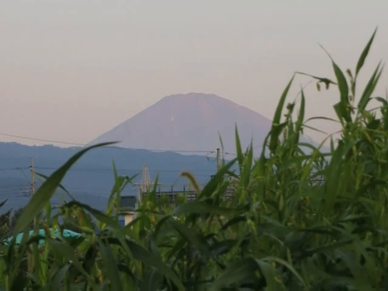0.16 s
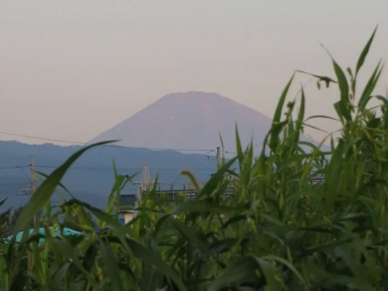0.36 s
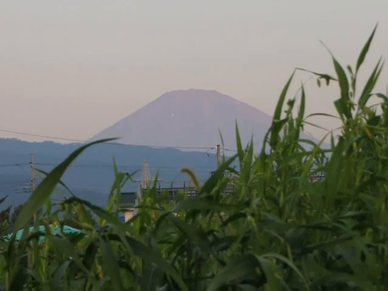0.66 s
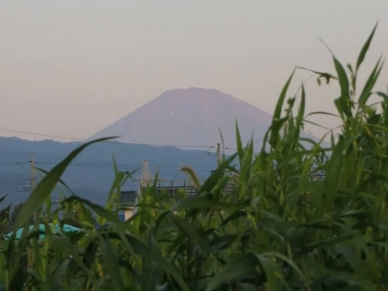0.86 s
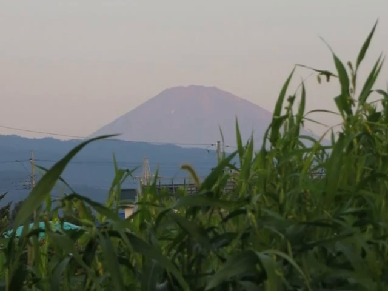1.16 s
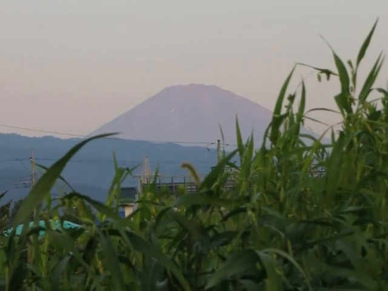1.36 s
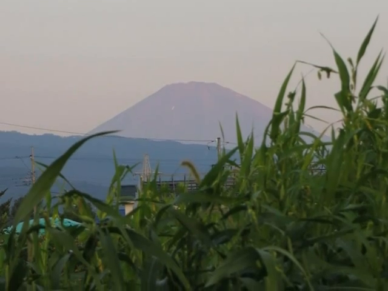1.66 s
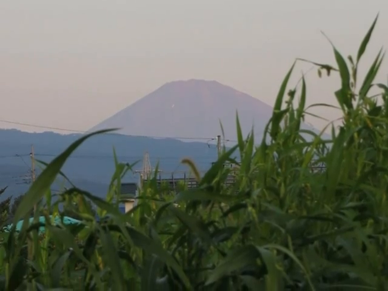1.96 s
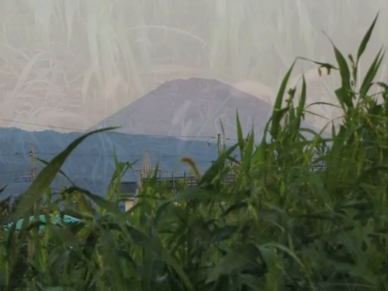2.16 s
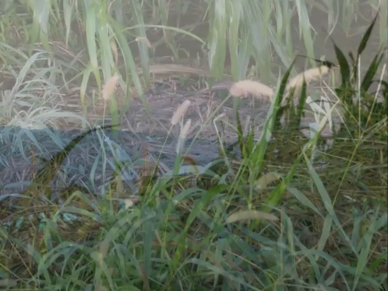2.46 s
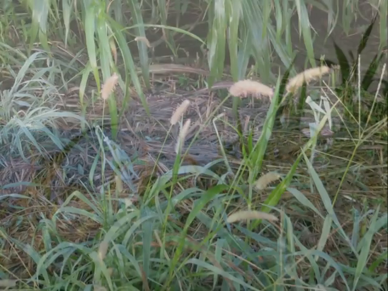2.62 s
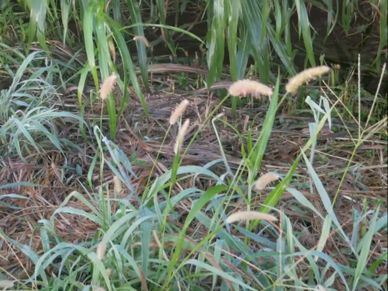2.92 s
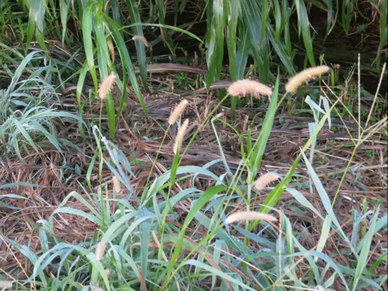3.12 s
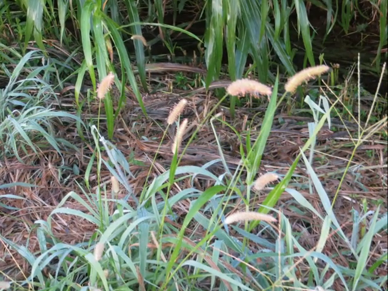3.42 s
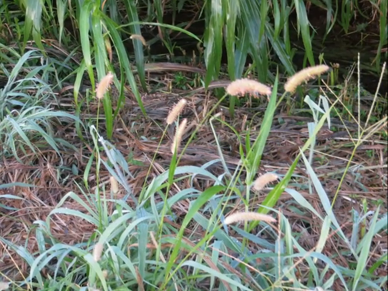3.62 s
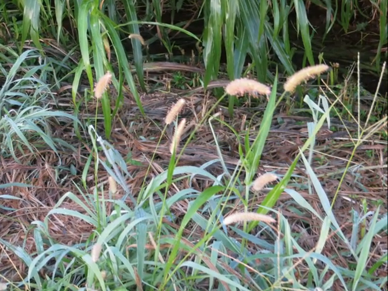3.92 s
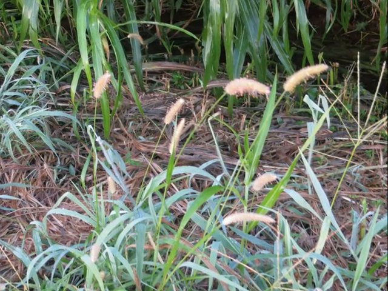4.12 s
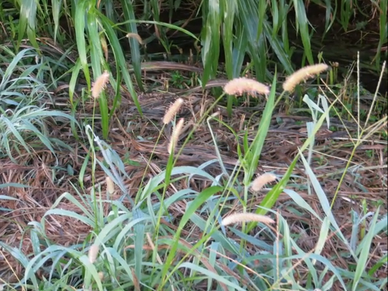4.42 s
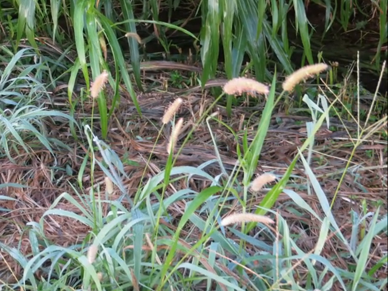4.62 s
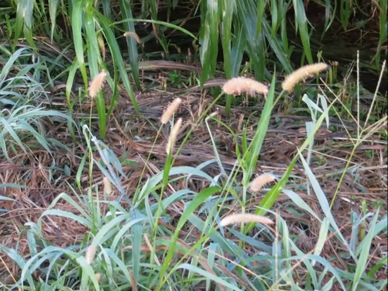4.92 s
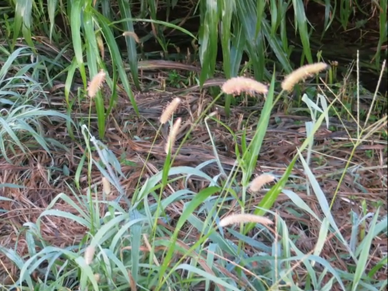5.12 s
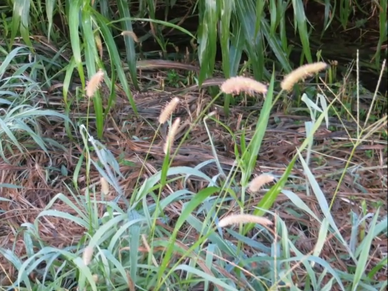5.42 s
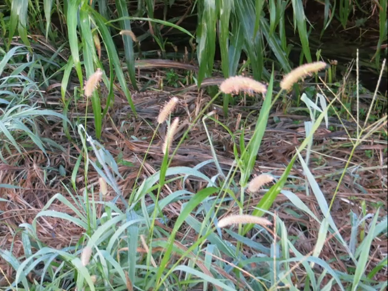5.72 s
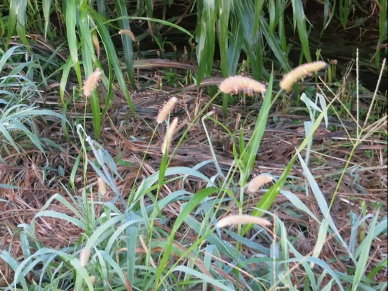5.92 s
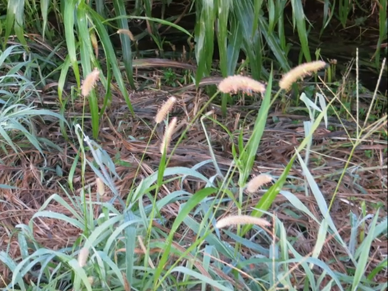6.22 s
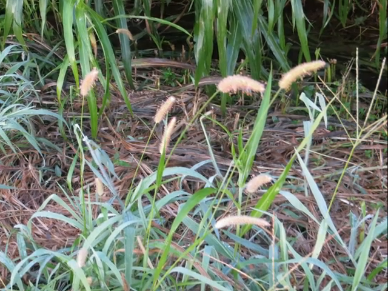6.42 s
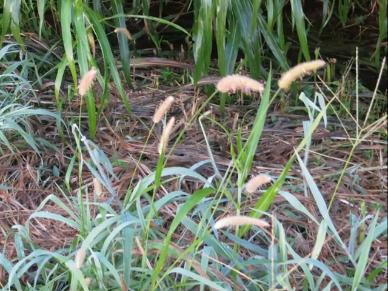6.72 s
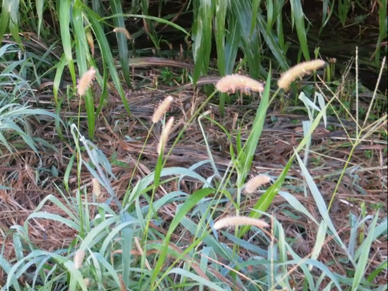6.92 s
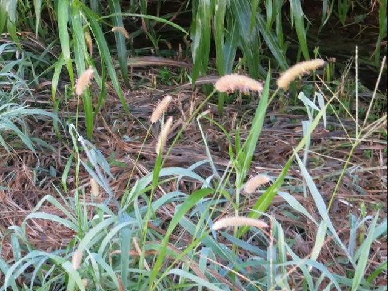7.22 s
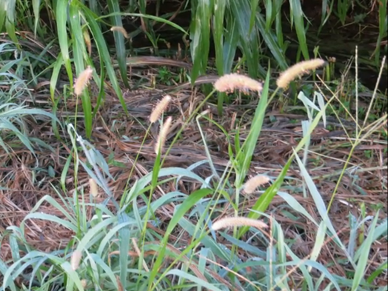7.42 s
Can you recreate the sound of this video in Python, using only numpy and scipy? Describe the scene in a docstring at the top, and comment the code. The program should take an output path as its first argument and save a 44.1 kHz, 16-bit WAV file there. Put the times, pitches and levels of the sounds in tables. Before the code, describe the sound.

A dusk field of insects: crisp rapid cricket chirps, lower drawn-out churrs and a blurred far chorus above a soft traffic rumble.

```python
"""Crickets in tall field grass at dusk: some near, some fainter, chirp in bursts of short falling wing strokes;
small ones trill above them, deeper ones draw long strokes and small groups of shorter ones, and a far crowd
blurs into bands. A whistle, soft blips and ticks pass; distant traffic and open air are shaped noise.
A small camera samples at half rate and holds each sample, mirroring the treble."""
import sys
import numpy as np
from scipy import signal
from scipy.fft import rfft, irfft, next_fast_len
from scipy.io import wavfile
from scipy.ndimage import map_coordinates

SR = 44100
rng = np.random.default_rng(int(sys.argv[2]) if len(sys.argv) > 2 else 0)


def store_pcm(level_fs):
    """Save levels as 16-bit WAV."""
    pcm = np.round(np.clip(level_fs, -1, 1) * 32767).astype(np.int16)
    wavfile.write(sys.argv[1], SR, np.atleast_2d(pcm).T)


def gain_from_db(level_db):
    """Convert decibel levels to linear amplitude factors (20 dB per decade)."""
    decades = np.asarray(level_db, float) / 20
    return 10 ** decades


N = 333837

# Wings, one row per singer: centre in Hz, fall in Hz, stroke in ms, swell exponent (above 1 swells late),
# period in ms, share of energy heard through grass 0-1.
CHIRP_WINGS = [(4650, 950, 11, 1.2, 17.3, .1), (4750, 1000, 11.5, 1.2, 15.9, .1),
               (4850, 1150, 12, 1.45, 14.6, .15), (5000, 1150, 12.5, 1.1, 15.5, .25),
               (5300, 1500, 14.5, 1.75, 15.85, .15)]
TRILL_WINGS = [(6500, 1100, 17, 1.1, 27.8, .1), (6750, 1300, 22, 1.6, 28.3, .6),
               (7300, 600, 20, 1, 23.1, .5), (7600, 600, 18, 1, 25.5, .5)]
# Chirp bouts, one list per singer. Each row: first stroke in seconds, base level in dB, chirps,
# seconds between chirps.
CHIRP_BOUTS = [
    [(1.151, -44, 1, .14), (3.1245, -42, 1, .14), (4.087, -40.5, 4, .137), (6.207, -39.5, 5, .1422)],
    [(.212, -45.5, 6, .1643), (1.974, -44.5, 6, .1631), (2.701, -47, 3, .1685), (4.794, -45.5, 6, .1625),
     (6.777, -45, 5, .163), (7.004, -46.5, 2, .163)],
    [(-.073, -45.5, 4, .1447), (.76, -39, 8, .1463), (3.123, -38, 7, .1463), (5.157, -38, 10, .1437)],
    [(.0943, -48, 7, .1545), (1.943, -46.5, 7, .141), (3.442, -49, 5, .153), (4.262, -48, 5, .158),
     (5.65, -49, 1, .15), (6.312, -48, 2, .165), (7.036, -48, 3, .147)],
    [(-.0205, -40.5, 2, .1535), (1.13, -41.5, 11, .1522), (3.843, -40.5, 12, .1525),
     (6.443, -40.5, 9, .1532)],
]
# Chirp habits, one row per singer: strokes a chirp, dB gained from stroke to stroke,
# dB added to a bout's opening chirp, dB added to its closing chirp.
CHIRP_HABITS = [(4, 3, -3.5, -0.5), (5, -1, -1, -4), (4, 0.4, -8, 1), (5, -1, 1, -2), (4, -0.54, -4, -2)]
# Trill bursts, one list per singer. Each row: first stroke in seconds, base level in dB, strokes.
TRILL_BURSTS = [
    [(0.560, -47.5, 6), (1.275, -48, 6), (2.013, -47, 5), (2.877, -47, 5), (3.754, -47.5, 5),
     (4.376, -48, 5), (5.397, -48.5, 5), (6.342, -48.5, 5), (7.317, -47.5, 5)],
    [(0.7822, -52.5, 5), (2.1177, -52, 4), (3.4537, -52, 5), (4.642, -53.5, 5), (4.736, -54, 5),
     (5.886, -52.5, 5), (7.2371, -52, 5)],
    [(4.823, -48.5, 5), (5.5475, -48, 5), (6.94, -47.5, 5)],
    [(0.0514, -55.5, 5), (1.5764, -56.5, 5), (2.9674, -54, 5), (4.523, -55, 5), (5.972, -54.5, 5),
     (7.4246, -55, 5)],
]
# Deep groups, one list per kind of stroke: near long strokes, short grouped strokes, a second singer's
# long strokes, a far singer's strokes. Each row: first stroke in seconds, base level in dB, strokes,
# seconds between strokes.
DEEP_GROUPS = [
    [(-.064, -39.5, 5, .0798), (4.3515, -39.3, 8, .0808)],
    [(.389, -42, 4, .0535), (.676, -41.5, 3, .0515), (.8925, -41.5, 2, .051), (1.072, -42, 2, .046),
     (1.272, -44, 2, .054), (1.47, -43, 2, .055), (3.567, -49.5, 3, .162), (4.009, -49, 2, .049),
     (5.033, -41, 4, .054), (5.322, -42, 2, .051), (5.493, -42, 2, .05), (5.679, -42, 2, .049),
     (5.855, -43, 2, .052), (7.112, -51, 3, .047), (7.362, -47, 2, .157)],
    [(3.127, -43, 4, .0733), (6.64, -43.5, 6, .0733)],
    [(.325, -49, 5, .072), (.831, -52, 1, .08), (1.045, -51, 6, .086), (1.56, -51, 6, .076),
     (2.126, -52, 2, .1), (2.276, -52, 2, .05), (2.475, -52, 2, .096), (4.247, -47.5, 6, .072),
     (5.608, -51, 11, .0823), (6.505, -47.5, 8, .0772), (7.275, -50, 1, .08), (7.476, -51, 1, .08)],
]
# Deep strokes, one row per kind: centre in Hz, mean stroke in ms, dB added to a group's opening stroke.
DEEP_STROKES = [(3574, 49, -4), (3533, 40, -2), (3610, 53.5, -3), (3797, 40, -1.5)]
# Far crowds. Each row: centre in Hz, spread in Hz, fall in Hz, stroke in ms, strokes a second, rms in dB.
FAR_CROWDS = [(3703, 100.6, 455, 40, 90, -58.5), (4874, 136, 1030, 13, 75, -62.5),
              (7390, 170, 380, 20, 200, -72)]
# One rising whistle: middle in seconds, level in dB, centre in Hz, rise in Hz, length in ms.
RISING_WHISTLE = (4.3, -58, 5750, 1500, 55)
# Soft short far notes. Each row: middle in seconds, level in dB, pitch in Hz.
SOFT_BLIPS = [(1.4, -57, 700), (3.068, -56, 540), (4.4, -57, 900)]
# Faint ticks. Each row: middle in seconds, level in dB, centre in Hz.
DRY_TICKS = [(0.4415, -49, 2220), (1.4688, -52, 1360), (3.3187, -48, 2170), (6.4877, -55, 2260)]
# Traffic course. Each row: time in seconds, rumble rms in dB, engine drone rms in dB.
TRAFFIC_LEVELS = [(0.0, -42.5, -56.5), (6.64, -41.5, -71), (7.57, -43, -71)]
# Traffic rumble spectrum. Each row: frequency in Hz, relative density in dB per Hz.
ROAD_SPECTRUM = [(11, -43), (18, -9.5), (48, 0.5), (92, -7), (145, -7.5), (226, -17.5), (500, -36.5),
                 (650, -47), (1100, -120)]
# Open air hiss spectrum. Each row: frequency in Hz, relative density in dB per Hz.
AIR_SPECTRUM = [(150, -47), (400, -3), (700, -0.2), (1100, -5), (2000, -8), (3000, -13), (4200, -2),
                (6000, -10.5), (8200, -15.5), (9500, -18), (11000, -13)]


def unit(x):
    """Scale x to rms 1."""
    return x / np.sqrt(np.mean(x ** 2) + 1e-20)


def filtered(x, response):
    """Multiply the spectrum of x by response(Hz)."""
    m = next_fast_len(N + 8192)
    return irfft(rfft(x, m) * response(np.fft.rfftfreq(m, 1 / SR)), m)[:N]


def wobble(rate_hz):
    """Smooth random curve through rate_hz knots a second."""
    knots = rng.standard_normal(int(N * rate_hz / SR) + 4)
    return map_coordinates(knots, [np.arange(N) * rate_hz / SR])


def coloured(spectrum):
    """Noise of rms 1, its spectrum interpolated over log frequency."""
    f_hz, level_db = np.transpose(spectrum)

    def response(hz):
        return gain_from_db(np.interp(np.log(hz + 1), np.log(f_hz + 1), level_db))

    return unit(filtered(rng.standard_normal(N), response))


def unrolled(rows):
    """Time, level and index in series of each repeat, from rows of (s, dB, count, gap in s)."""
    first_s, level_db, count, gap_s = np.transpose(rows)
    row = np.repeat(np.arange(len(rows)), np.round(count).astype(int))
    k = np.arange(len(row)) - np.searchsorted(row, row)
    return first_s[row] + k * gap_s[row], level_db[row], k


def strokes(middle_s, level_db, hz, fall_hz, ms, octave_db, peak):
    """Tones that fall as the scraper slows, with an octave partial; peak above 1 swells late."""
    columns = np.broadcast_arrays(middle_s, level_db, hz, fall_hz, ms)
    middle_s, level_db, hz, fall_hz, ms = (c[:, None] for c in columns)
    t = np.arange(int(np.max(ms) * SR / 1000) + 1)
    progress = np.minimum(t / (ms * SR / 1000), 1)
    cycles = np.cumsum(hz + fall_hz * (.5 - progress), axis=1) / SR
    phase = 2 * np.pi * (cycles + rng.random(middle_s.shape))
    envelope = gain_from_db(level_db) * np.sin(np.pi * progress ** peak)
    tone = envelope * (np.sin(phase) + gain_from_db(octave_db) * np.sin(2 * phase))
    # a second of margin each side holds strokes that cross the ends
    start = np.round((middle_s - ms / 2000) * SR).astype(int) + SR
    return np.bincount((start + t).ravel(), tone.ravel(), minlength=N + 2 * SR)[SR:N + SR]


def grass(x, t60_s):
    """Scatter off stems and leaves: a short dense tail of energy 1, new each third of a second."""
    out = np.zeros(N + SR)
    step = SR // 3
    t = np.arange(SR // 4) / SR
    for k in range(0, N, step):
        tail = rng.standard_normal(len(t)) * gain_from_db(-60 * t / t60_s)
        wet = signal.fftconvolve(x[k:k + step], tail / np.linalg.norm(tail))
        out[k:k + len(wet)] += wet
    return out[:N]


def bursts(rows, wings, first_db, scatter_db, octave_db, t60_s, grow_db=0):
    """Evenly spaced wing strokes, the first offset by first_db; part arrives through the grass."""
    hz, fall_hz, ms, peak, period_ms, hidden = wings
    s, level_db, k = unrolled([(*row, period_ms / 1000) for row in rows])
    chance = rng.standard_normal((len(s), 2))
    level_db = level_db + first_db * (k == 0) + grow_db * (k - 2) + scatter_db * chance[:, 0]
    song = strokes(s, level_db, hz + 25 * chance[:, 1], fall_hz, ms, octave_db, peak)
    return np.sqrt(1 - hidden) * song + np.sqrt(hidden) * grass(song, t60_s)


def chirpers():
    """Five singers, some near and some fainter, chirp steadily within each bout; wings sound the octave."""
    jitter_s, scatter_db = .001, 1
    total = np.zeros(N)
    for rows, wings, habit in zip(CHIRP_BOUTS, CHIRP_WINGS, CHIRP_HABITS):
        count, grow_db, opening_db, closing_db = habit
        s, level_db, k = unrolled(rows)
        closing = np.roll(k, -1) == 0
        chance = rng.standard_normal((len(s), 2))
        chirp_s = s + jitter_s * chance[:, 0]
        chirp_db = level_db + opening_db * (k == 0) + closing_db * closing + scatter_db * chance[:, 1]
        chirps = np.transpose([chirp_s, chirp_db, count + 0 * s])
        total += bursts(chirps, wings, first_db=-1.5, scatter_db=1.7, octave_db=-23.5,
                        t60_s=0.065, grow_db=grow_db)
    return total


def trillers():
    """Four small high singers, their strokes longer and slower than the chirpers'."""
    return sum(bursts(rows, wings, first_db=-4, scatter_db=0.6, octave_db=-60, t60_s=0.076)
               for rows, wings in zip(TRILL_BURSTS, TRILL_WINGS))


def deep_singers():
    """Long strokes and small groups of shorter ones, all falling at the same speed, plus grass scatter."""
    fall_hz_per_ms = 11.23
    direct = np.zeros(N)
    for rows, (hz, ms, opening_db) in zip(DEEP_GROUPS, DEEP_STROKES):
        s, level_db, k = unrolled(rows)
        chance = rng.standard_normal((len(s), 3))
        stroke_ms = ms * (1 + .06 * chance[:, 0])
        stroke_db = level_db + opening_db * (k == 0) + 0.93 * chance[:, 1]
        direct += strokes(s, stroke_db, hz + 12 * chance[:, 2], fall_hz_per_ms * stroke_ms, stroke_ms,
                          octave_db=-31, peak=1.0)
    return direct + gain_from_db(-11.0) * grass(direct, t60_s=0.05)


def crowds():
    """Many far singers at scattered moments, swelling a little, heard through the grass."""
    total = np.zeros(N)
    for hz, spread_hz, fall_hz, ms, rate_hz, rms_db in FAR_CROWDS:
        s = np.arange(0, N / SR, 1 / rate_hz)
        chance = rng.standard_normal((len(s), 3))
        stroke_s = s + .3 * chance[:, 0] / rate_hz
        stroke_hz = hz + spread_hz * np.clip(chance[:, 2], -1.5, 1.5)
        calls = strokes(stroke_s, 2.5 * chance[:, 1], stroke_hz, fall_hz, ms, octave_db=-40, peak=1)
        total += gain_from_db(rms_db + .8 * wobble(6.5)) * unit(calls + .7 * grass(calls, t60_s=.1))
    return total


def whistle():
    """One faint short tone gliding up."""
    s, level_db, hz, rise_hz, ms = np.array(RISING_WHISTLE)[:, None]
    return strokes(s, level_db, hz, -rise_hz, ms, octave_db=-60, peak=0.87)


def blips():
    """Soft steady tones of 35 ms that swell early."""
    s, level_db, hz = np.transpose(SOFT_BLIPS)
    return strokes(s, level_db, hz, 0, 35, octave_db=-60, peak=.7)


def ticks():
    """Dry falling tones about nine cycles long, with a strong octave."""
    s, level_db, hz = np.transpose(DRY_TICKS)
    return strokes(s, level_db, hz, 0.37 * hz, 9000 / hz, octave_db=-6, peak=0.98)


def traffic():
    """Smooth low rumble of noise, and a narrow noise drone that fades as it draws away."""
    drone_hz, drone_width_hz = 275, 87
    s, *levels = np.transpose(TRAFFIC_LEVELS)
    rumble_db, drone_db = (np.interp(np.arange(N) / SR, s, level) for level in levels)
    rumble = gain_from_db(rumble_db + 1.2 * wobble(2.95)) * coloured(ROAD_SPECTRUM)
    drone = filtered(rng.standard_normal(N), lambda hz: np.exp(-((hz - drone_hz) / drone_width_hz) ** 2))
    return rumble + gain_from_db(drone_db) * unit(drone)


def open_air():
    """Slightly gusty hiss: shaped noise under a wavering level."""
    return gain_from_db(-57 + 1.2 * wobble(9)) * coloured(AIR_SPECTRUM)


def scene():
    """All singers and small sounds over traffic and air."""
    singers = chirpers() + trillers() + deep_singers() + crowds()
    small_sounds = whistle() + blips() + ticks()
    return (singers + small_sounds + traffic() + open_air())[None]


def low_pass(x):
    """Removes everything above the highest recorded frequency."""
    return signal.sosfilt(signal.butter(12, 16810, fs=SR, output="sos"), x)


def record(dry):
    """Every second sample is held twice, so each tone gains a mirror image about the half-rate limit."""
    half_rate_edge_hz, top_hz = 10460, 15650
    band = filtered(dry[0], lambda hz: 1 / (1 + (hz / half_rate_edge_hz) ** 30))
    held = np.repeat(band[::2], 2)[:N]
    mix = filtered(held, lambda hz: hz < top_hz)[None]
    return low_pass(mix)


dry = scene()
out = record(dry)
store_pcm(out)
```